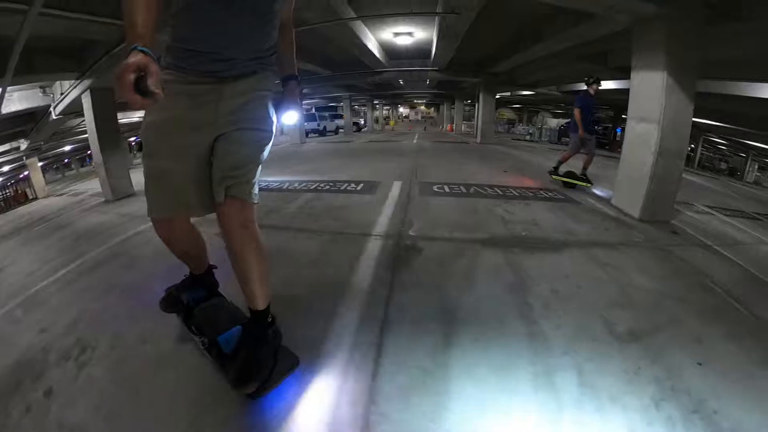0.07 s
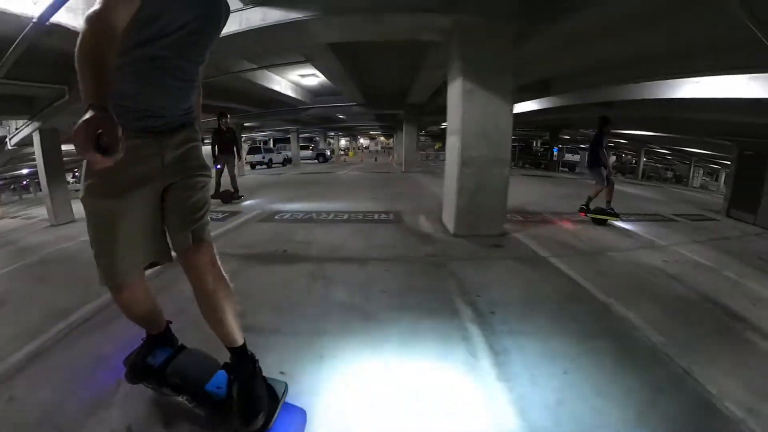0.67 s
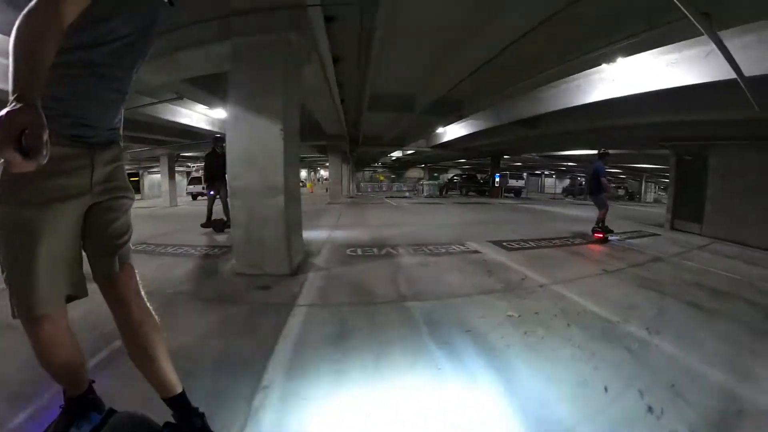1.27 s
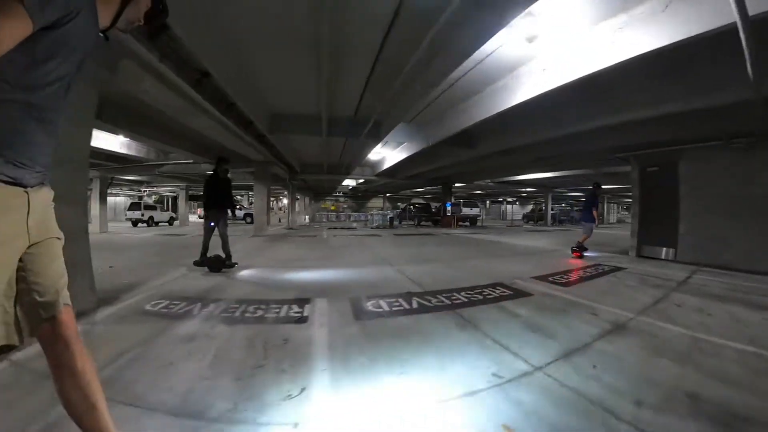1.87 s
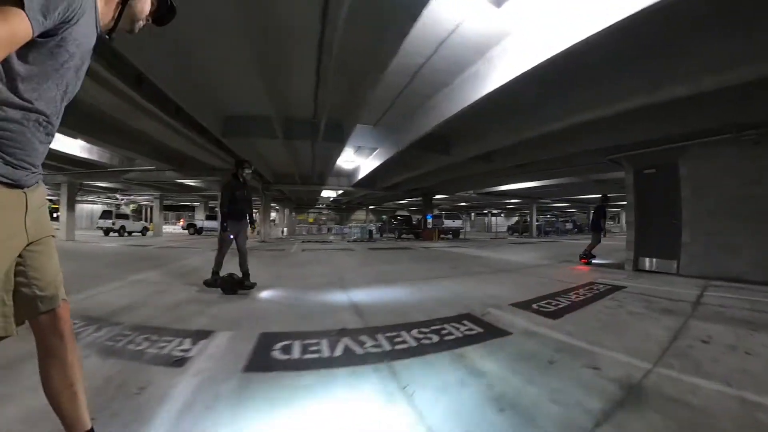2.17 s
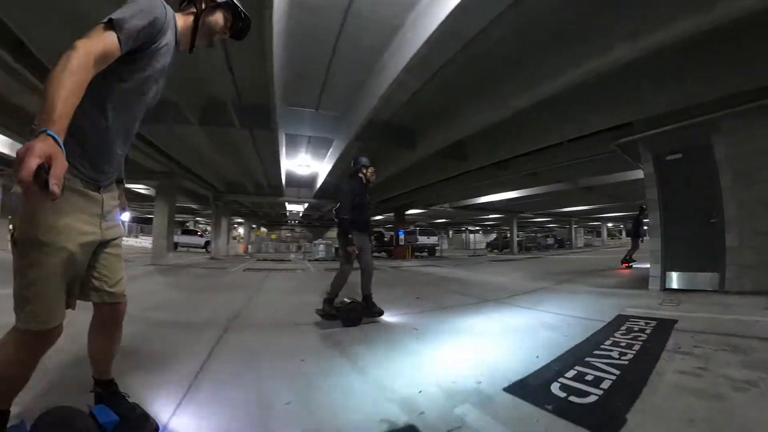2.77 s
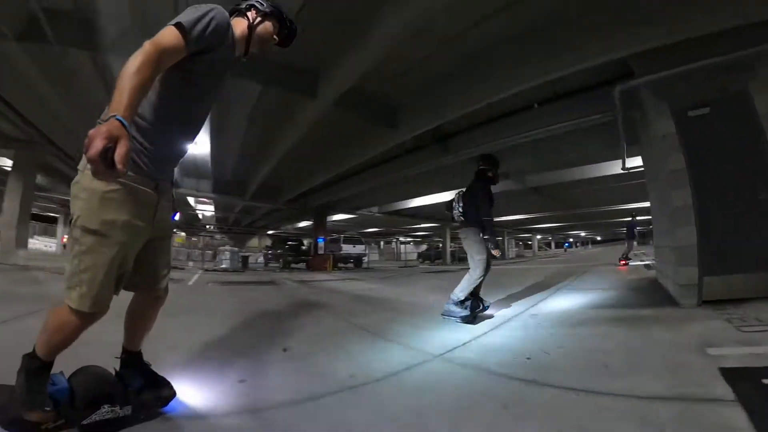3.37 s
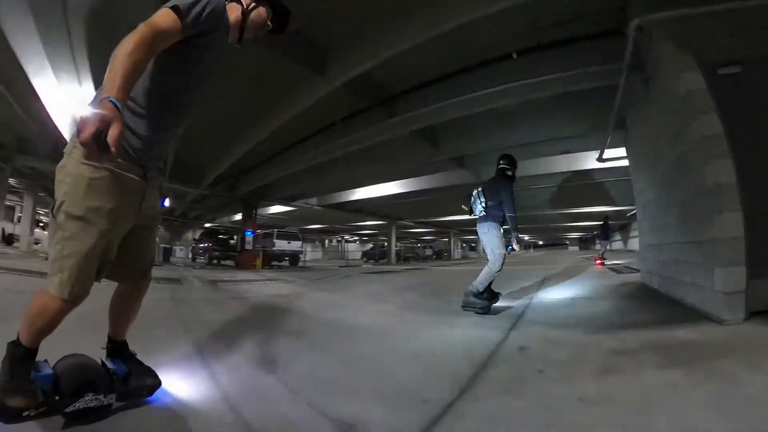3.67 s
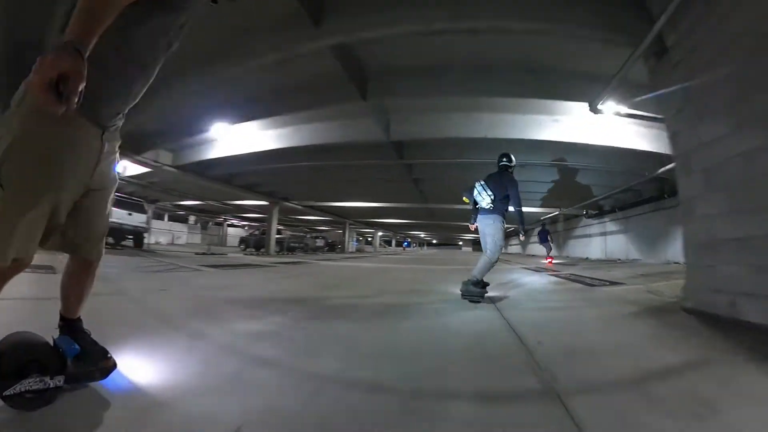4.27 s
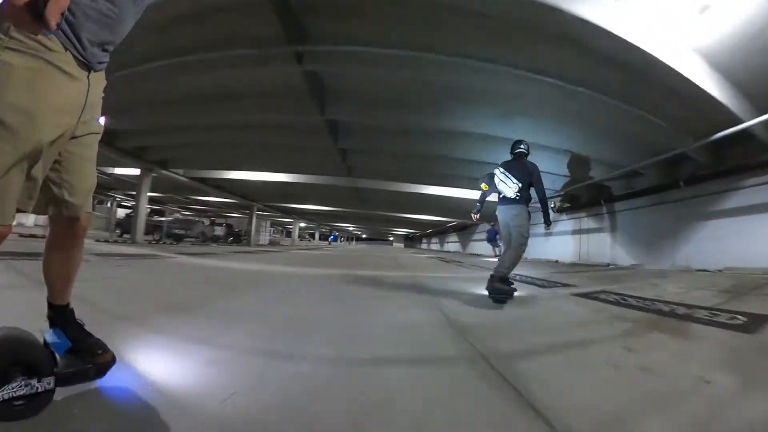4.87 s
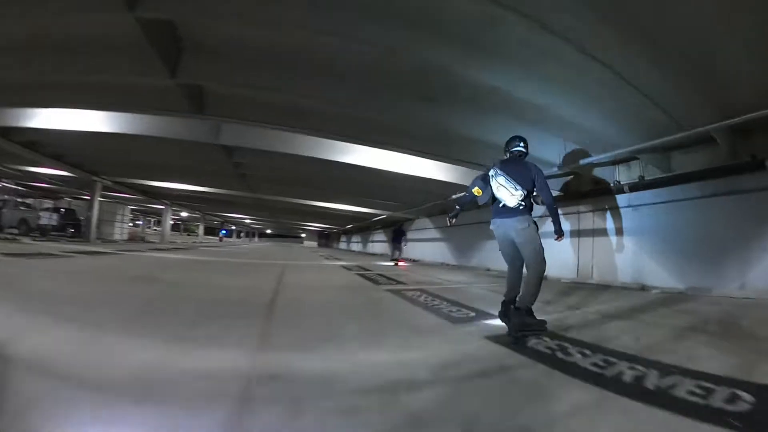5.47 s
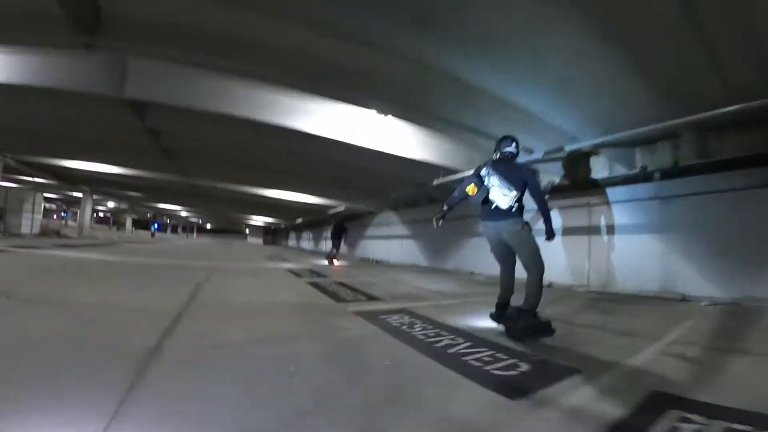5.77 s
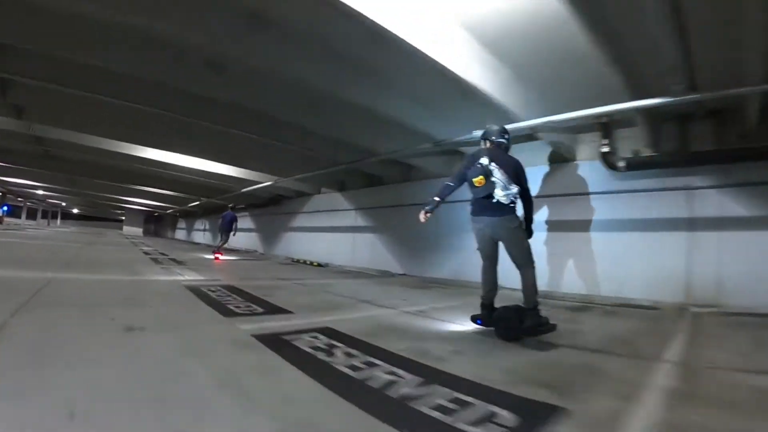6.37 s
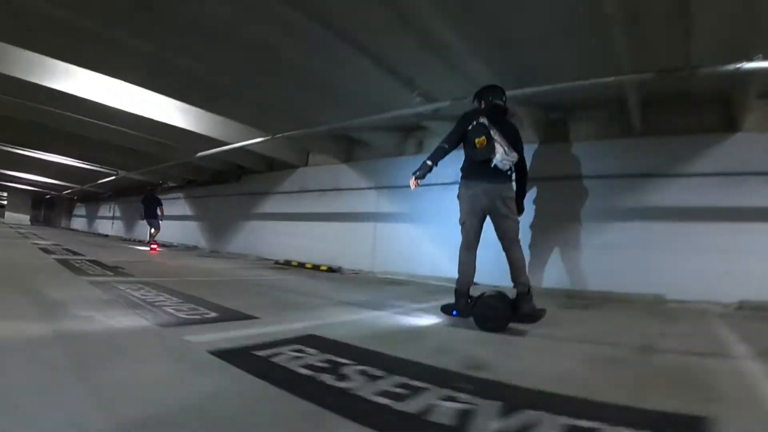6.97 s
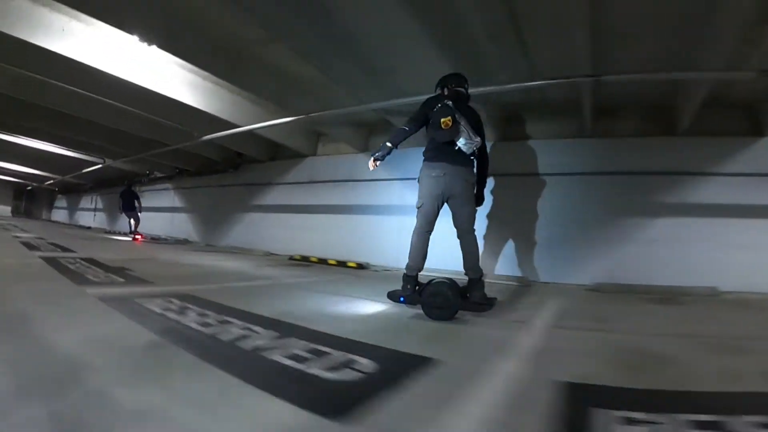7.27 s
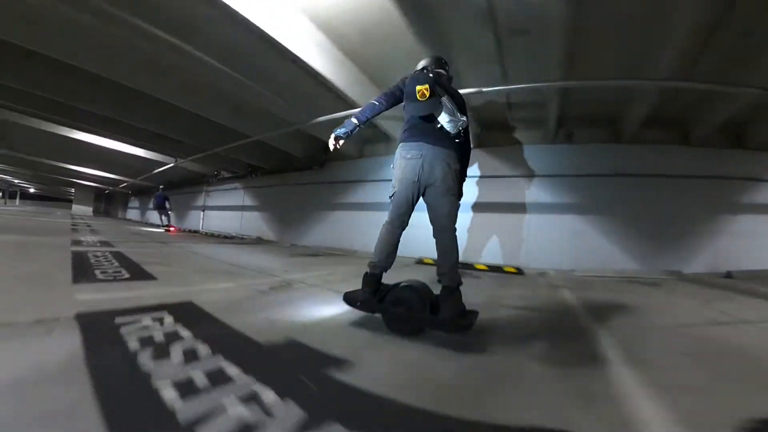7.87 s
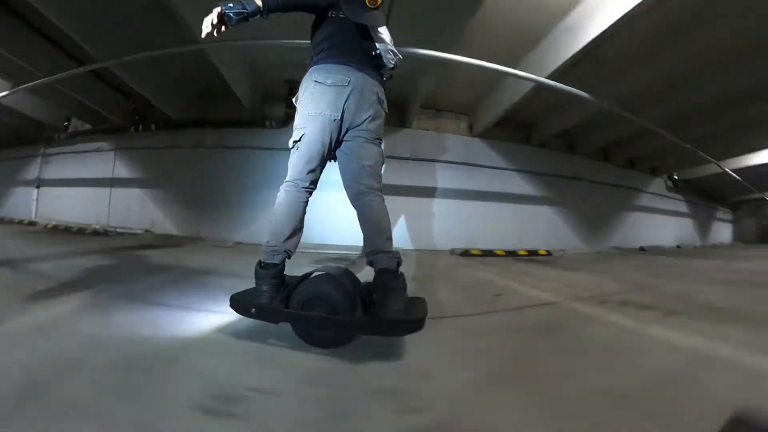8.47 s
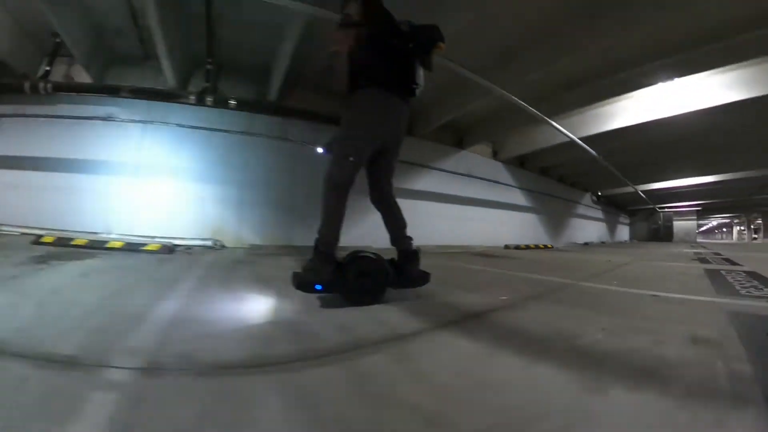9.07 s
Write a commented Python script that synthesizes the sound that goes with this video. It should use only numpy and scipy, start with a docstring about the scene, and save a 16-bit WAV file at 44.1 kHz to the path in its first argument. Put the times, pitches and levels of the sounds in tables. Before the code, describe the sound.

Gusts of riding wind thump on a moving microphone throughout, over the tyres and wavering motors of one-wheeled electric boards in a concrete garage. At first the rolling is rough and crackly, with a short snapping scuff of rubber. It then quietens on smoother floor and the whine fades back. From about six seconds a second board draws near, its tread ringing with a hollow whirr that rises and falls.

```python
"""Fat tyres rumble, roar and crunch grit on coarse concrete, then soften on smoother floor after 3 s.
One-wheeled electric boards are gliding through a parking garage, one rider carrying the microphone.
Floor texture drums on the tyre and pumps air from its tread; slipping rubber scuffs and snaps.
Hub motors hum and whine under the low ceiling, a second board draws near with its tread ringing,
and eddies of riding wind buffet the microphone."""
import sys
import numpy as np
from scipy import signal
from scipy.fft import rfft, irfft, next_fast_len
from scipy.io import wavfile
from scipy.ndimage import uniform_filter1d

SR = 44100
rng = np.random.default_rng(int(sys.argv[2]) if len(sys.argv) > 2 else 0)


def generate_wav(signal):
    """Clip the signal to [-1, 1] and save it as 16-bit WAV at the path in sys.argv[1]."""
    frames = np.transpose(np.atleast_2d(signal))
    scaled = np.clip(frames, -1, 1) * 32767
    pcm = np.round(scaled).astype(np.int16)
    wavfile.write(sys.argv[1], SR, pcm)


N = 406602
TIME = np.arange(N) / SR
FFT_SIZE = next_fast_len(N, True)
FREQ_HZ = np.arange(FFT_SIZE // 2 + 1) * SR / FFT_SIZE
SWING_START_S, SWING_LENGTH_S = 4.88, 0.46   # microphone swings away from its own board


def from_db(db):
    """Decibels to gain."""
    return 10 ** (np.asarray(db) / 20)


def unit_rms(x):
    """Scale to rms 1."""
    return x / np.sqrt(np.mean(x ** 2) + 1e-20)


def even(x, window_s):
    """Hold power steady over spans longer than the window."""
    return x / np.sqrt(uniform_filter1d(x * x, int(window_s * SR)) + 1e-9)


def curve(rows):
    """Breakpoints interpolated at every sample."""
    return np.interp(TIME, *np.transpose(rows))


def ramp(start_s, length_s):
    """Linear rise from 0 to 1."""
    return np.clip((TIME - start_s) / length_s, 0, 1)


def swell(crest_s, length_s):
    """Bell-shaped envelope of height 1."""
    return np.exp(-np.pi * np.minimum(np.abs((TIME - crest_s) / length_s), 10) ** 2)


def bursts(rows, attack_s):
    """Summed envelopes: linear attack, exponential fade."""
    return sum(ramp(start_s, attack_s) * from_db(db - fade_db_per_s * np.clip(TIME - start_s - attack_s, 0, 3))
               for start_s, db, fade_db_per_s in rows)


def noise():
    """White noise, rms 1."""
    return rng.standard_normal(N)


def drift(per_s):
    """Slow random wander, rms 1."""
    spectrum = rfft(rng.standard_normal(FFT_SIZE)) / (1 + (FREQ_HZ / per_s) ** 4)
    return unit_rms(irfft(spectrum, FFT_SIZE)[:N])


def grains(per_s, spread_db):
    """Random tiny impacts of uneven size, rms 1."""
    sizes = from_db(spread_db * np.minimum(rng.exponential(1, N), 5)) * rng.choice([-1, 1], N)
    return unit_rms(sizes * (rng.random(N) < per_s / SR))


def colour(x, spectrum):
    """Shape a spectrum, falling 47 dB per octave beyond its ends; rms 1."""
    hz, db = np.transpose(spectrum)
    octave, points = np.log2(FREQ_HZ + 1), np.log2(hz)
    beyond = np.abs(octave - np.clip(octave, points[0], points[-1]))
    gain = from_db(np.interp(octave, points, db) - 47 * beyond)
    return unit_rms(irfft(rfft(x, FFT_SIZE) * gain, FFT_SIZE)[:N])


def resonance(x, hz, width_hz):
    """Two-pole resonator, peak gain 1."""
    r = np.exp(-np.pi * width_hz / SR)
    feedback = [1, -2 * r * np.cos(2 * np.pi * hz / SR), r * r]
    return signal.lfilter(np.array([1, 0, -1]) * (1 - r * r) / 2, feedback, x)


def relax(impulses, decay_s):
    """Give each impulse an exponential tail."""
    return signal.lfilter([1], [1, -np.exp(-1 / (decay_s * SR))], impulses + 1e-18)


def waver(x, depth, per_s):
    """Let all pitches wander together."""
    n = np.arange(N)
    return np.interp(n + np.cumsum(depth * drift(per_s)), n, x, period=N)


def motor_tone(pitch_hz, wander):
    """A sine whose pitch trembles with the wheel."""
    return np.sin(2 * np.pi * np.cumsum(pitch_hz * (1 + wander * drift(45.3))) / SR)


def coarseness():
    """Share of coarse concrete under the tyre as it gives way to smooth."""
    return 1 - 0.926 * ramp(start_s=2.83, length_s=0.43)


def garage(x, low_t60_s=1.27, high_t60_s=0.5):
    """Diffuse tail between concrete floor and ceiling; the treble dies sooner."""
    t = TIME[:2 * SR]
    white = rng.standard_normal(len(t))
    low = signal.sosfilt(signal.butter(2, 3000, fs=SR, output="sos"), white)
    tail = low * from_db(-60 * t / low_t60_s) + (white - low) * from_db(-60 * t / high_t60_s)
    tail *= t > 0.009
    return signal.fftconvolve(x, tail / np.sqrt(np.sum(tail ** 2)))[:N]


# electronics spectrum: freq_hz, gain_db
WHISTLE_SPECTRUM = [(13700, -11), (14050, -3), (14400, -13), (14680, -7), (14900, -25)]

def whistle(level_db=-86.5):
    """The motor's power electronics hiss in a narrow, high band until the microphone swings away."""
    fade = 1 - ramp(SWING_START_S - SWING_LENGTH_S, SWING_LENGTH_S)
    return from_db(level_db) * fade * colour(noise(), WHISTLE_SPECTRUM)


def click(start_s=5.4233, peak_db=-29):
    """A faint, dry digital click: one step in the signal that dies away at once."""
    impulse = np.zeros(N)
    impulse[int(start_s * SR)] = from_db(peak_db)
    return relax(impulse, decay_s=0.0004)


# dust patches: start_s, level_db, fade_db_per_s
DUST_PATCHES = [(0.75, -55, 47), (1.22, -55, 51), (1.48, -51.5, 26), (2.05, -50.5, 52), (2.9, -60, 170),
                (4.03, -65.5, 12.5), (6.52, -63, 23), (8.98, -65, 72)]
# dust spectrum: freq_hz, gain_db
DUST_SPECTRUM = [(3000, -2), (4800, -1.5), (6500, -7.5), (8400, -12), (10500, -22.5), (14000, -34.5)]

def swish():
    """Fine dust thrown off the tread gives a bright, grainy hiss."""
    return bursts(DUST_PATCHES, attack_s=0.046) * colour(grains(per_s=7600, spread_db=1.5), DUST_SPECTRUM)


# reflected roar: freq_hz, gain_db
WALL_SPECTRUM = [(340, -10.5), (400, -0.5), (480, -11), (600, -1), (730, 0), (900, -5.5), (1400, -19),
                 (2500, -24.5)]

def wall_reflection(crest_db=-46):
    """A concrete wall throws back the second tyre's roar as it passes."""
    return from_db(crest_db) * swell(crest_s=7.08, length_s=0.92) * colour(noise(), WALL_SPECTRUM)


# second board's approach: time_s, level_db
APPROACH = [(0, -65), (5.2, -65), (5.6, -55), (6.2, -56), (6.39, -41.5), (6.5, -43.5), (6.72, -52.5),
            (7.1, -48), (7.48, -43.5), (7.95, -51), (8.35, -48), (8.45, -42.5), (8.62, -47.5),
            (9.02, -39.5), (9.2, -41.5)]
# its tread and deck modes: pitch_hz, width_hz, gain_db
TREAD_MODES = [(394, 60, -2.5), (512, 150, -3.5), (1040, 70, -2), (1193, 100, -5.5), (1376, 260, -8)]
# its thump over a floor joint: freq_hz, gain_db
THUMP_SPECTRUM = [(300, -1), (500, 1), (800, -1), (1050, 2), (1300, 1), (1700, -10), (3000, -23)]

def second_board():
    """Pumped air rings between tread and floor; the tyre thumps on a joint; up close the motor whines."""
    air = noise()
    ring = sum((-1) ** k * from_db(db) * resonance(air, hz, width_hz)
               for k, (hz, width_hz, db) in enumerate(TREAD_MODES))
    gain = from_db(curve(APPROACH) + 0.89 * drift(7.1))
    ring = waver(ring, depth=0.028, per_s=4)   # the rider balances
    whirr = gain * colour(ring, [(250, -16.5), (420, 1.5), (1500, -3.5), (3000, -17)])
    thump = bursts([(8.182, -35.5, 135)], attack_s=0.013) * colour(noise(), THUMP_SPECTRUM)
    near_whine = unit_rms(garage(motor_tone(pitch_hz=540, wander=0.05)))
    return whirr + thump + from_db(-42.5) * ramp(start_s=8.72, length_s=0.5) * near_whine


# speed changes: start_s, length_s, pitch_hz, climb_hz_per_s, level_db
GLIDES = [(0.04, 0.2, 550.6, -19, -36), (0.518, 0.2, 541, -89, -36.5), (1.268, 0.23, 557, 8, -46),
          (2.02, 0.1, 520.5, 60, -35.5), (2.388, 0.09, 534, 127, -37), (2.716, 0.19, 427, 128, -40),
          (3.05, 0.12, 478, 169, -39.5), (3.448, 0.33, 564, 114, -46), (3.81, 0.16, 454, 122, -47),
          (3.95, 0.1, 547, -20, -43), (4.24, 0.45, 556, -31, -48), (4.323, 0.18, 436, 290, -40),
          (4.582, 0.12, 767, 13, -47)]

def motor_whine(coarse_db=-47.5, smooth_db=-58, flicker_db=6.5, fade_db_per_s=7, room_db=-6):
    """The motors hold a tone at cruise and glide as speed changes; reflections smear it and make it flicker."""
    cruise_db = smooth_db + (coarse_db - smooth_db) * coarseness() + 2.5 * drift(3.2)
    cruise_db += flicker_db * np.tanh(drift(8.3))
    tone = from_db(cruise_db) * motor_tone(pitch_hz=546, wander=0.0242)
    for start_s, length_s, hz, climb_hz_per_s, db in GLIDES:
        age_s = np.clip(TIME - start_s, 0, 1)
        gate = ramp(start_s, 0.032) * (1 - ramp(start_s + length_s, 0.049))
        glide = motor_tone(hz + climb_hz_per_s * age_s, wander=0.0118)
        tone += gate * from_db(db - fade_db_per_s * age_s) * glide
    return tone + from_db(room_db) * garage(tone)


# hum under motor load: time_s, relative_db
HUM_LEVEL = [(0.1, -48), (0.7, -29.5), (2.3, -33), (2.9, -21), (3.4, -42.5), (4.1, -34), (4.7, -42.5),
             (7.5, -42.5), (8.5, -31), (9.2, -33.5)]
# motor orders: multiple, gain_db
HUM_ORDERS = [(1, 2), (2, -10), (4, -19), (6, -30)]

def motor_hum(pitch_hz=88.85, wander=0.02467, trim_db=-1):
    """The hub hums at wheel speed; each order swells and fades among the reflections."""
    phase = 2 * np.pi * np.cumsum(pitch_hz * (1 + wander * drift(3.89))) / SR
    hum = sum(from_db(db + 2.8 * np.tanh(drift(9.7))) * np.sin(k * phase) for k, db in HUM_ORDERS)
    return from_db(curve(HUM_LEVEL) + trim_db) * unit_rms(hum)


# airflow as the microphone moves in and out of the stream: time_s, relative_db
AIRSTREAM = [(0.08, -35.5), (0.45, -28.5), (1.0, -30.5), (2.1, -33), (2.35, -26.5), (2.95, -25),
             (3.2, -30.5), (3.55, -36), (4.55, -37.5), (4.75, -29), (5.5, -30.5), (5.95, -28), (6.6, -32),
             (7.4, -27), (8.4, -29.5), (9.2, -30)]
# gusts: crest_s, length_s, relative_db
WIND_GUSTS = [(0.287, 0.17, -25.5), (0.5, 0.045, -22), (0.57, 0.051, -23.5), (0.676, 0.026, -20.5),
              (1.023, 0.074, -30), (1.506, 0.044, -20.5), (1.941, 0.05, -25.5), (2.206, 0.036, -26),
              (2.303, .04, -23), (2.37, 0.029, -21), (2.451, 0.031, -14.5), (2.613, 0.06, -21),
              (2.79, 0.056, -16.5), (2.908, 0.047, -16.5), (2.992, 0.028, -22), (3.726, 0.12, -29),
              (4.28, 0.053, -32), (4.97, 0.057, -18.5), (5.043, 0.1, -22.5), (5.856, 0.06, -21),
              (5.95, 0.099, -23.5), (6.137, 0.038, -24), (6.283, 0.095, -23), (6.82, 0.025, -21.5),
              (7.12, 0.031, -21.5), (7.312, 0.032, -25), (7.389, 0.029, -24), (7.46, 0.028, -25),
              (7.613, 0.041, -23), (7.764, 0.027, -26), (7.86, 0.035, -23), (7.95, 0.044, -26),
              (8.029, 0.036, -23), (8.29, 0.17, -25.5), (8.408, 0.023, -22.5), (8.61, 0.045, -26),
              (8.79, 0.054, -24.5), (8.863, 0.028, -22), (9.167, 0.056, -26)]
# eddy spectrum: freq_hz, gain_db
EDDY_SPECTRUM = [(10, 2.5), (25, -1.5), (55, 1.5), (90, -4.5), (125, -5.5), (170, -18.5), (210, -25),
                 (260, -31.5), (500, -41.5), (1200, -70)]

def wind(flutter_db=1.4, trim_db=1.5, ceiling=0.26):
    """Eddies shed at the microphone give lumps of pressure; the largest are rounded off."""
    power = from_db(curve(AIRSTREAM) + flutter_db * drift(14)) ** 2
    power += sum((from_db(db) * swell(crest_s, length_s)) ** 2 for crest_s, length_s, db in WIND_GUSTS)
    eddies = even(colour(grains(per_s=1100, spread_db=2.5), EDDY_SPECTRUM), window_s=0.05)
    return ceiling * np.tanh(from_db(trim_db) * np.sqrt(power) * eddies / ceiling)


# sideways slips: start_s, level_db, fade_db_per_s
SLIPS = [(2.01, -48, 34), (2.08, -42, 71), (2.82, -42.5, 91), (2.9, -53, 160)]
# tread catching and snapping free: start_s, level_db, fade_db_per_s
TREAD_SNAPS = [(2.038, -31, 1500), (2.0576, -23.5, 1900), (2.0771, -30, 1300), (2.113, -32, 1500),
               (2.126, -45, 1500), (2.137, -35, 2000)]
# slipping rubber: freq_hz, gain_db
RUBBER_SPECTRUM = [(900, 1), (1600, -5), (2300, 0.5), (3000, -15), (4200, -16.5), (6300, -15),
                   (9000, -26.5)]

def scuff():
    """Rubber slips on dusty concrete: sharp snaps in a run of tiny ones that dies as the tyre grips."""
    envelope = bursts(SLIPS, attack_s=0.011) + bursts(TREAD_SNAPS, attack_s=0.00062)
    return envelope * colour(grains(per_s=3700, spread_db=2.5), RUBBER_SPECTRUM)


# tyre work through the carves: time_s, work_db
CARVING = [(0.08, -1.5), (1.0, 0.5), (1.6, 2), (1.88, 0.5), (2.15, 2.8), (2.55, -0.5), (2.9, -0.4),
           (3.5, 0), (4.1, -0.5), (4.65, 1), (5.3, -1.6), (6.3, -2), (6.6, -1.3), (7.05, -1.5), (8.1, 1.5),
           (9.1, 4)]

def tyre_gain(load, coarse_db, smooth_db, work_slope, load_db):
    """Gain of a tyre sound from floor coarseness, carving work and momentary load."""
    floor_db = smooth_db + (coarse_db - smooth_db) * coarseness()
    return from_db(floor_db + work_slope * curve(CARVING) + load_db * load)


# larger grains cracking: start_s, relative_db
LARGE_GRAINS = [(0.6994, -41), (0.803, -38), (1.2794, -39), (2.15, -36), (2.555, -37), (2.8184, -48),
                (2.8963, -40), (2.9508, -36.5), (5.6535, -53), (7.007, -54), (7.4294, -56), (7.6492, -53),
                (8.6612, -51), (8.7874, -53), (9.0215, -46)]
# crushed grit: freq_hz, gain_db
CRUNCH_SPECTRUM = [(1500, -8), (2400, -3), (3600, -6), (5800, 4.5), (8400, -1.5), (10500, -11),
                   (14000, -28)]

def grit(chips_per_s=330, chip_db=-12, chip_fade_db_per_s=261, room_db=-2):
    """Small grains crackle at random under the tyre; large ones break into chips that are crushed in turn."""
    blows = np.abs(grains(per_s=46, spread_db=3))
    blows /= blows.max()
    blows *= tyre_gain(drift(3), coarse_db=-51.5, smooth_db=-64.5, work_slope=2.5, load_db=-2.5)
    chips = (rng.random(N) < chips_per_s / SR) * rng.random(N)
    chip_fade = from_db(chip_db - chip_fade_db_per_s * np.minimum(TIME, 1))
    for start_s, db in LARGE_GRAINS:
        at, size = int(start_s * SR), from_db(db) / np.sqrt(8)
        blows[at] = size
        blows[at:] += size * chips[at:] * chip_fade[:N - at]
    crunch = relax(blows, decay_s=0.004) * colour(grains(per_s=14000, spread_db=2.5), CRUNCH_SPECTRUM)
    return crunch + from_db(room_db) * garage(crunch)


# floor bumps, tread roar and edge hiss on each floor: freq_hz, gain_db
COARSE_BUMPS = [(60, 1.5), (120, 0.5), (175, 3), (240, 3.5), (340, 0.5), (420, -1.5), (530, -6),
                (640, -5.5), (800, -12.5), (1100, -14), (2500, -52.5)]
SMOOTH_BUMPS = [(60, -4), (120, 1), (175, -0.5), (220, 1.5), (285, -2), (340, 0), (410, -4), (530, -6),
                (640, -5.5), (780, -9), (1100, -26.5), (2500, -52.5)]
COARSE_ROAR = [(400, -19), (750, -2), (900, -3.5), (1100, 1.5), (1350, -3.5), (1650, -4), (2100, -9),
               (2800, -11), (4000, -21.5), (6000, -41)]
SMOOTH_ROAR = [(400, -19.5), (720, -4), (880, -2), (1060, 1), (1300, -3.5), (1650, -7), (2100, -12),
               (2900, -16.5), (4000, -22.5), (6000, -35)]
COARSE_HISS = [(2000, -14), (3500, 2), (4500, -2), (5100, -0.5), (6500, -5.5), (8400, -10), (9700, -20),
               (11200, -33), (15000, -42)]
SMOOTH_HISS = [(2000, -4.5), (3500, 4), (4500, -2.5), (5100, -2), (6500, -5), (8400, -14.5), (9700, -18),
               (11200, -25), (15000, -42.5)]
# tyre and deck modes: pitch_hz, width_hz, coarse_db, smooth_db
CARCASS_MODES = [(57.4, 8.7, 0, -7), (121, 10, -9.5, 0), (158, 7.8, 4, 1), (176.3, 16, -2, -3),
                 (330, 35, -14, -5), (443, 38, -2, -9), (500, 37, -9.5, -8.5)]

def tyres(swing_loss_db=5.5):
    """Floor texture drums on the carcass, pumps air from the contact patch and crackles at its edge."""
    coarse = coarseness()
    on_coarse, on_smooth = np.sqrt(coarse), np.sqrt(1 - coarse)
    load = drift(8.9)   # uneven floor
    bumps = on_coarse * colour(noise(), COARSE_BUMPS) + on_smooth * colour(noise(), SMOOTH_BUMPS)
    ring = sum(from_db(smooth_db + (coarse_db - smooth_db) * coarse) * resonance(bumps, hz, width_hz)
               for hz, width_hz, coarse_db, smooth_db in CARCASS_MODES)
    rumble = even(unit_rms(bumps + ring), window_s=0.96)
    rumble *= from_db(-swing_loss_db * ramp(SWING_START_S, SWING_LENGTH_S))
    roar = on_coarse * colour(grains(per_s=9000, spread_db=2), COARSE_ROAR)
    roar += on_smooth * colour(noise(), SMOOTH_ROAR)
    hiss = on_coarse * colour(grains(per_s=13000, spread_db=1), COARSE_HISS)
    hiss += on_smooth * colour(grains(per_s=16000, spread_db=-0.5), SMOOTH_HISS)
    return (rumble * tyre_gain(load, coarse_db=-29, smooth_db=-37, work_slope=-0.07, load_db=1.04)
            + roar * tyre_gain(load, coarse_db=-35.5, smooth_db=-45, work_slope=1, load_db=0.53)
            + hiss * tyre_gain(load, coarse_db=-50, smooth_db=-65.5, work_slope=0.78, load_db=-0.9))


def scene():
    """All sources at one microphone."""
    mix = (wind() + tyres() + motor_hum() + motor_whine() + whistle() + second_board()
           + wall_reflection() + scuff() + swish() + grit() + click())
    return mix[None, :]


def record(dry):
    """Abrupt onset; steep low-pass, stopband from 16 kHz."""
    lowpass = signal.cheby2(12, 70, 16000, fs=SR, output="sos")
    return signal.sosfilt(lowpass, dry * ramp(start_s=0.073, length_s=0.001))


dry = scene()
out = record(dry)
generate_wav(out)
```